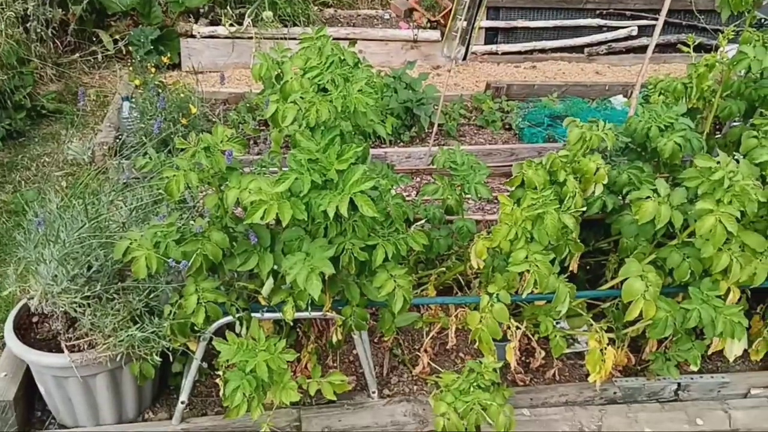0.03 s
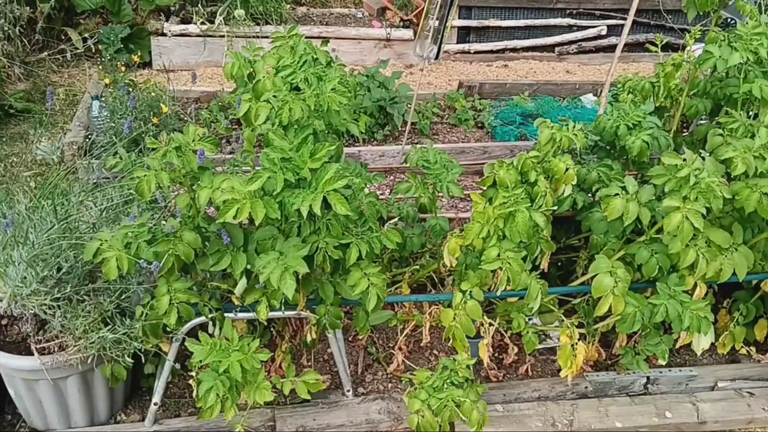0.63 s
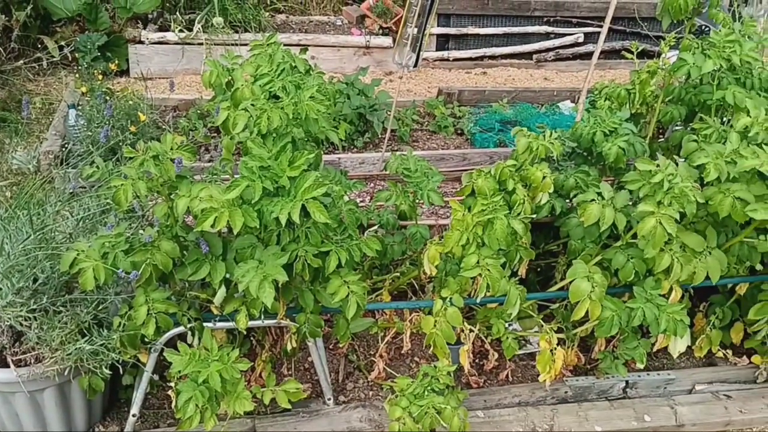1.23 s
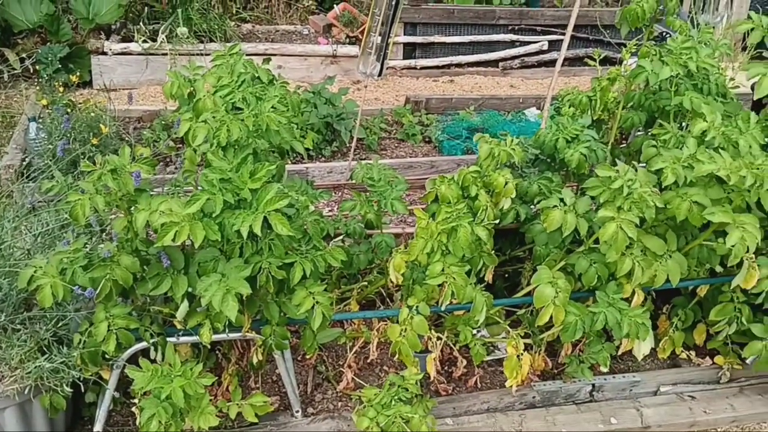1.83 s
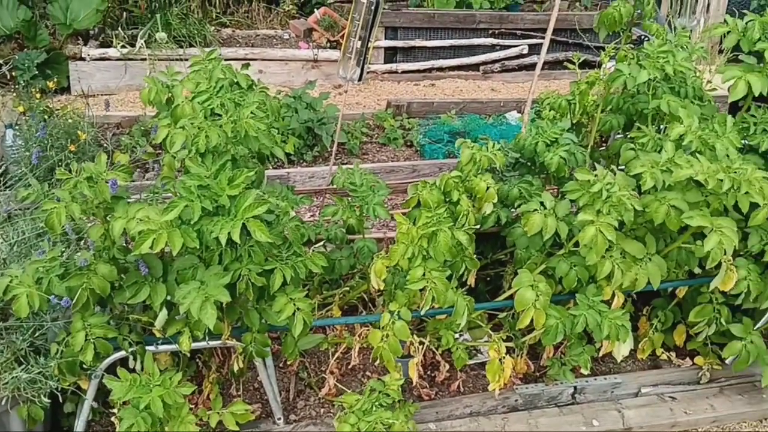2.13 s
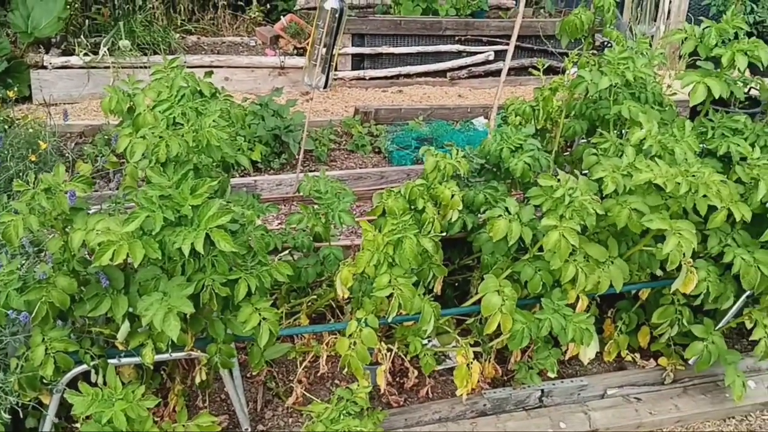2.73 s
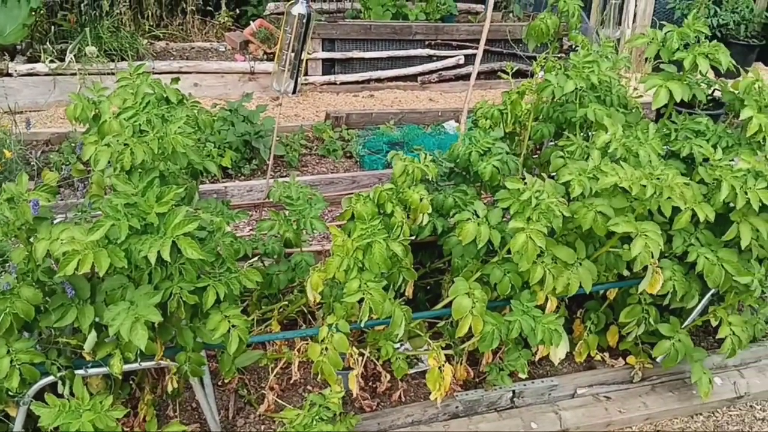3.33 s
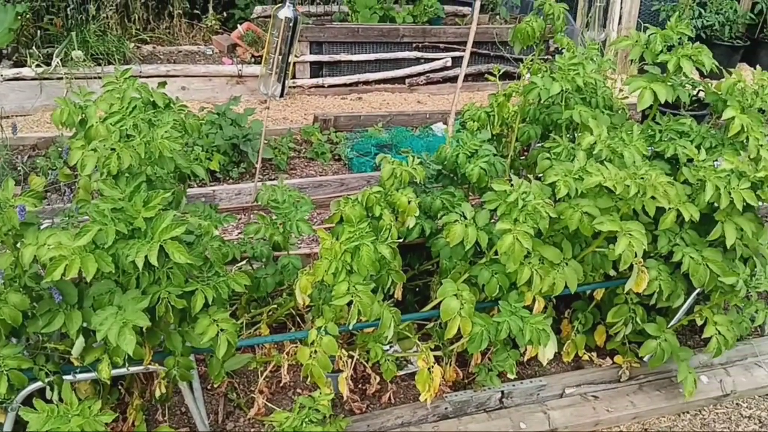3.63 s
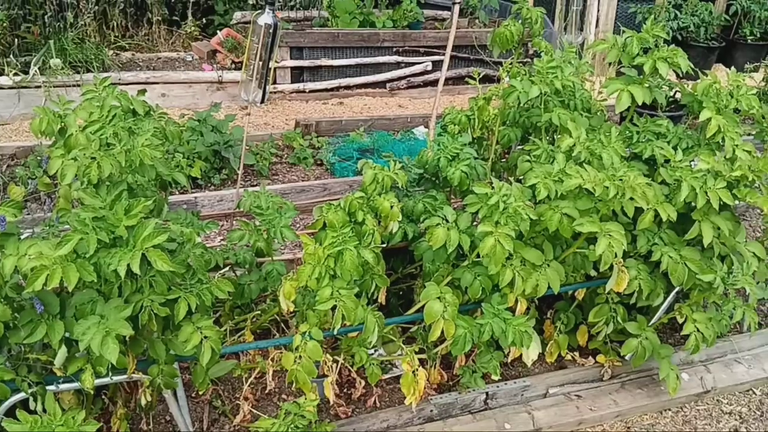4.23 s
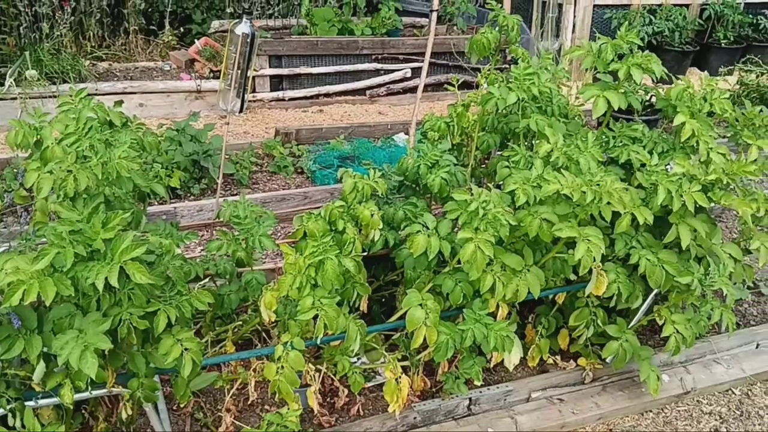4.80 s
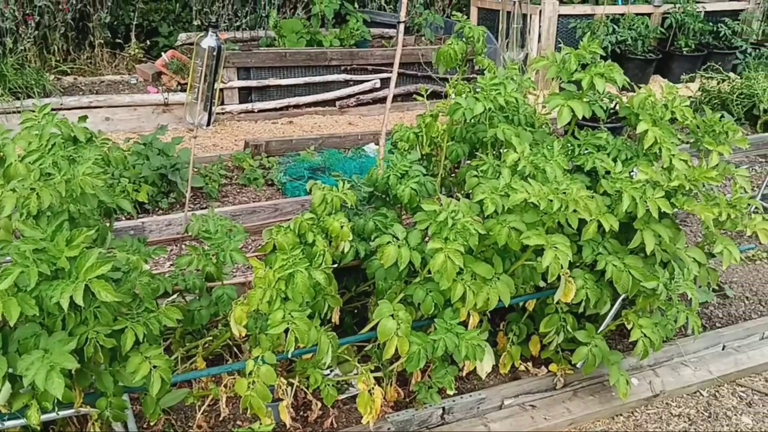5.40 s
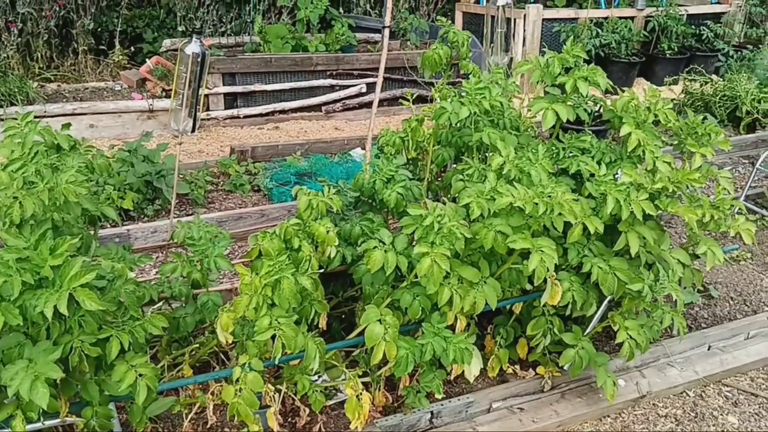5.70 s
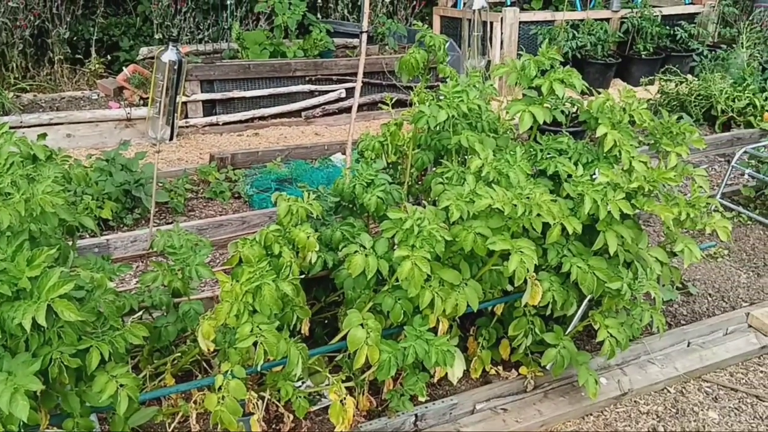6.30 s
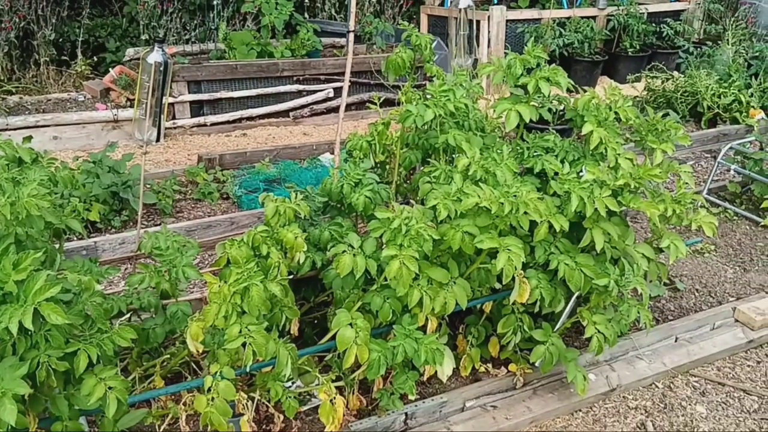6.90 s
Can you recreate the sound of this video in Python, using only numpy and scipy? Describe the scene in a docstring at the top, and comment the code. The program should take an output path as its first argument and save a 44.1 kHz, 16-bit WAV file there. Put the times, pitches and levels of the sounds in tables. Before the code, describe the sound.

A light wind thumps on the microphone and drops, leaving far traffic, faint bird chirps and a slight leaf rustle.

```python
"""A steady roar of far traffic over a quiet garden, with low buffets of breeze that soon drop.
The roar is tyre noise dulled by distance; under it far engines drone and a motor's hum throbs.
The buffets are eddies at a phone's two microphone ports. Small birds whistle and trill faintly,
scattered by fences and leaves. Close by, leaves brush and tick. The phone adds hiss and a thin whine."""
import sys
import numpy as np
from scipy import signal
from scipy.fft import rfft, irfft
from scipy.io import wavfile
from scipy.ndimage import uniform_filter1d

SR = 44100
rng = np.random.default_rng(int(sys.argv[2]) if len(sys.argv) > 2 else 0)


def waveform_to_disk(signal):
    """Save audio, clipped to [-1, 1], as 16-bit WAV at the path in sys.argv[1]."""
    frames = np.transpose(np.atleast_2d(signal))
    scaled = np.clip(frames, -1, 1) * 32767
    samples = np.round(scaled).astype(np.int16)
    wavfile.write(sys.argv[1], SR, samples)


N = 306495
T = np.arange(N) / SR
FREQS = np.maximum(np.arange(N // 2 + 1) * SR / N, 1)
PORT_LAG_S = 63 / SR  # left port behind right


def traffic(gain_db=0.3, ebb_db_per_s=0.31, swell_db=0.3, flutter_db=0.75):
    """Tyre roar dulled by distance; it slowly thins out and its band edges waver."""
    # tyre spectrum: (frequency [Hz], left [dB/Hz], right [dB/Hz])
    spectrum = [(297, -83, -86.5), (440, -82.5, -84), (534.5, -74, -75), (652, -64, -70.5),
                (800, -61, -67.5), (993, -61, -69.5), (1167, -66, -71), (1546, -66, -78),
                (1790, -70, -85.5), (1995, -71.5, -88), (2342, -84, -99.5), (2590, -100.2, -101.5),
                (2940, -108, -106.8), (4200, -114.5, -115)]
    # wavering bands: (centre [Hz], half width [Hz], changes [1/s], depth [dB], ebb [dB/s])
    edges = [(456, 130, 12, 2.5, 1.1), (2240, 170, 18, 2.5, -0.5), (2480, 240, 20, 2.5, 0)]
    roar = colour(far_field(), spectrum)
    roar *= undb(gain_db - ebb_db_per_s * T + swell_db * walk(2.66) + flutter_db * walk(12))
    for hz, half_width_hz, rate_hz, depth_db, band_ebb_db_per_s in edges:
        level_db = depth_db * walk(rate_hz) - band_ebb_db_per_s * (T - T.mean())
        roar = sway(roar, hz, half_width_hz, level_db)
    return sway(roar, hz=2140, half_width_hz=230, db=-7 * bell(2.5, 0.086))  # upper edge dips once


def wind(breeze_hz=54, breeze_db=-43, drop_at_s=2.8, drop_db_per_s=6, gust_hz=68, flutter_db=3):
    """Air at the ports: a breeze that drops, fluttering gusts, single eddies that thump."""
    # gusts: (middle [s], length [s], level [dB], left minus right [dB])
    gusts = [(0.724, 0.21, -21, 4.5), (0.973, 0.38, -35.5, 1), (1.75, 0.37, -32.5, -4.5),
             (2.399, 1, -39.5, -1.5), (3.3, 0.73, -38.5, 8), (6.382, 0.31, -38, 2.5)]
    # strongest eddies: (middle [s], length [s], centre [Hz], left [dB], right [dB])
    eddies = [(0.034, 0.064, 67, -26, -29.5), (0.542, 0.055, 55.7, -49, -25), (0.65, 0.11, 79, -31, -26),
              (.73, 0.1, 98.5, -19.5, -32), (0.802, 0.066, 152, -15.5, -42), (0.895, 0.054, 80, -22, -36),
              (0.951, 0.088, 73.6, -18, -36), (1.045, 0.079, 75.6, -21.5, -39),
              (1.362, 0.04, 69, -43.5, -28.5), (1.588, 0.053, 56, -51, -29), (1.685, .14, 84, -53, -27),
              (1.769, .08, 75.6, -41, -24), (1.839, .14, 63.7, -27, -39), (1.992, .04, 60, -53, -23.5),
              (2.125, 0.047, 55.6, -45, -29.5), (2.225, 0.073, 51.6, -32, -27.5),
              (2.376, 0.028, 51.6, -21.5, -57), (2.41, 0.0356, 64, -52, -29.5), (2.592, .11, 98, -50, -34),
              (3.058, 0.039, 59.3, -27, -40), (3.238, 0.036, 66, -22.5, -30), (3.391, 0.042, 59, -28, -38),
              (4.23, 0.23, 190, -52, -55.5), (4.789, 0.077, 146, -49, -65), (4.97, 0.079, 63, -38, -38),
              (6.359, .08, 99, -47, -62), (6.687, 0.069, 59.6, -36.5, -39)]
    breeze_gain = undb(breeze_db - drop_db_per_s * np.maximum(T - drop_at_s, 0))
    gust_gain = sum(bell(s, length_s) * undb(db) * pan(pan_db) for s, length_s, db, pan_db in gusts)
    flutter = undb(flutter_db * np.array([walk(21), walk(21.16)]))
    out = (turbulence(N, breeze_hz) * breeze_gain + turbulence(N, gust_hz) * gust_gain) * flutter
    for s, length_s, hz, left_db, right_db in eddies:
        size = int(length_s * SR)
        thump = unit(turbulence(SR // 4, hz)[:, :size] * np.hanning(size))
        add(out, s - length_s / 2, thump * undb([[left_db], [right_db]]))
    return out


def turbulence(size, hz, width_ratio=0.52, cutoff_ratio=2.37, order=3.54):
    """Pressure of eddies passing at about hz, unrelated at the two ports; small eddies die out fast."""
    freqs = bin_hz(size)
    rolloff = np.sqrt(1 + (freqs / (cutoff_ratio * hz)) ** (2 * order))
    gain = resonance(freqs, hz, width_ratio * hz) / rolloff
    return unit(irfft(rfft(rng.standard_normal((2, size))) * gain, size))


def engines(gain_db=1, ebb_db_per_s=0.5, lump_db=0.5):
    """Lumpy drone of far engines, slowly ebbing."""
    # drone spectrum: (frequency [Hz], left [dB/Hz], right [dB/Hz])
    spectrum = [(14.6, -52.5, -72.5), (30, -69.5, -69), (39.7, -62, -63.5), (58.3, -46, -51.5),
                (84.9, -59, -62.5), (132, -64.5, -73.5), (171, -77.5, -79), (190, -72.5, -75.5),
                (196, -77.5, -84), (221, -80.5, -81.5), (288, -86.5, -96)]
    return colour(far_field(), spectrum) * undb(gain_db - ebb_db_per_s * T + lump_db * walk(12))


def motor(hz=208, wander_hz=7, throb_hz=7.05, swell_db=-58, fading_db=1.5, pan_db=3):
    """A far motor's hum throbs, swells and fades in the moving air."""
    # throbs that stand out: (time [s], level [dB])
    surges = [(3.9, -58), (4.2, -44), (4.35, -52), (4.77, -56), (5.33, -56), (5.62, -54.5)]
    throb = 1 + np.cos(2 * np.pi * throb_hz * (T - 4.2))
    phase = 2 * np.pi * np.cumsum(hz + wander_hz * walk(12)) / SR
    tone = np.sin([phase - 2 * np.pi * hz * PORT_LAG_S, phase])
    swell = undb(swell_db) * bell(4.37, length_s=4.2)
    swell += sum(undb(db) * bell(s, length_s=0.046) for s, db in surges)
    return tone * throb * swell * undb(fading_db * walk(13)) * pan(pan_db)


def birds(t60_s=0.38, wet_db=-1, dry_db=-5):
    """Thin notes, a trill and far chatter, scattered by fences and leaves."""
    # notes: (start [s], length [s], from [Hz], to [Hz], level [dB], left minus right [dB],
    # rasp [share of pitch])
    notes = [(0.27, .07, 4400, 4400, -80, 6, .018), (0.433, 0.18, 2710, 2650, -70, 6, 0.025),
             (0.657, 0.044, 6800, 6450, -77, 7.5, 0.02), (1.118, .08, 5500, 5330, -83, -4, .022),
             (1.81, 0.091, 4170, 4100, -74, 2, 0.012), (1.965, 0.07, 4480, 4440, -73, 9, .012),
             (2.05, 0.073, 4400, 4390, -70, 9, 0.025), (2.245, 0.074, 4440, 4430, -72.5, 7, 0.028),
             (2.345, .06, 3250, 3170, -75, -5, 0.021), (3.48, 0.041, 3810, 3750, -73.5, -3, .015),
             (4.02, .09, 4680, 4650, -85, 0, .01), (4.72, .42, 4620, 4590, -90, 2, .008),
             (5.2, .09, 4420, 4300, -82, 2, .025), (5.55, 0.037, 3780, 3720, -76.5, 3, .015),
             (6.362, 0.18, 7450, 7500, -81, -2, .04), (6.44, 0.2, 7950, 7980, -83.5, -4, .025)]
    calls = trill() + chatter()
    for s, length_s, from_hz, to_hz, db, pan_db, rasp in notes:
        size = int(length_s * SR)
        note = whistle(np.linspace(from_hz, to_hz, size), waver=rasp) * np.sqrt(np.hanning(size))
        add(calls, s, note * undb(db) * pan(pan_db))
    t = T[:SR // 2]
    scatter = unit(rng.standard_normal((2, len(t))) * decay(t, t60_s)) / np.sqrt(len(t))
    echoes = signal.fftconvolve(calls, scatter, axes=1)[:, :N]
    return undb(dry_db) * calls + undb(wet_db) * echoes


def trill(rate_hz=21, low_hz=4480, sweep_hz=760, wander_hz=120, pip_hz=7300, pip_db=-14, pan_db=6):
    """A small bird's quick raspy syllables slide down, each led by a weak high pip."""
    # trill bursts: (middle [s], length [s], level [dB])
    bursts = [(1.878, 0.11, -74), (2.07, 0.26, -71), (2.27, 0.17, -73.5)]
    progress = np.cumsum(rate_hz * (1 + .25 * walk(14))) / SR % 1  # 0 to 1 per syllable
    pitch_hz = low_hz + sweep_hz * (1 - progress) ** 2 + wander_hz * walk(30)
    syllables = whistle(pitch_hz, waver=.035) * np.sqrt(np.sin(np.pi * progress))
    pips = whistle(np.full(N, pip_hz), waver=.025) * np.cos(np.pi * progress) ** 2
    return (syllables + undb(pip_db) * pips) * swells(bursts) * pan(pan_db)


def chatter(count=620, low_hz=2750, high_hz=4900, length_s=0.068, glide=.07,
            spread_db=4, pan_db=-2, width_db=8, base_db=-92.5, chorus_db=-79.5):
    """Many far birds chirp, louder for a while; distance leaves mostly the lower chirps."""
    out, size = np.zeros((2, N)), int(length_s * SR)
    for when, pitch, slope, loud, side in rng.random((count, 5)):
        hz = low_hz * (high_hz / low_hz) ** (pitch ** 2)
        slide = 1 + glide * (slope - .5) * np.linspace(-1, 1, size)
        chirp = whistle(hz * slide, waver=.025) * np.hanning(size)
        gain = (low_hz / hz) ** 2 * undb(spread_db * loud)
        add(out, when * N / SR, chirp * gain * pan(pan_db + width_db * (side - .5)))
    return out * (undb(base_db) + undb(chorus_db) * bell(1.96, length_s=2.6))


def ticks(tail_db=-22, tail_t60_s=.06):
    """Tiny hard contacts: a short crack in one broad resonance, with a weak tail."""
    # contacts: (time [s], level [dB], ring [Hz], width [Hz], t60 [s], left minus right [dB])
    contacts = [(0.7763, -55.5, 9300, 2800, 0.017, -19), (3.835, -63, 3900, 3600, 0.014, -11),
                (5.204, -68, 5200, 7000, .012, 1)]
    out, size = np.zeros((2, N)), SR // 10
    t = T[:size]
    for s, db, hz, width_hz, t60_s, pan_db in contacts:
        response = resonance(bin_hz(size), hz, width_hz) ** 2
        ring = unit(irfft(rfft(rng.standard_normal((2, size))) * response, size))
        fade = decay(t, t60_s) + undb(tail_db) * decay(t, tail_t60_s)
        add(out, s, ring * fade * undb(db) * pan(pan_db))
    return out


def leaves(count=40000, spread_db=3, pan_db=-11):
    """Leaves brush close by: tiny dry clicks, dense enough to merge into a rustle."""
    # click spectrum: (frequency [Hz], relative level [dB])
    spectrum = [(3500, -1.5), (6000, -2), (8000, -6), (9500, 3.5), (11000, -5.5)]
    # leaves stirring: (middle [s], length [s], level [dB])
    rustles = [(2.1, 0.75, -85), (3.63, 1.35, -83.5), (3.605, 0.02, -84), (4.345, .06, -80),
               (5.5, 1.6, -87)]
    clicks = np.zeros((2, N))
    when, loud, side = rng.random((count, 3)).T
    strength = undb(-spread_db * np.log(1 - .99 * loud))  # many weak, few strong
    np.add.at(clicks, ((side > .5).astype(int), (when * N).astype(int)), strength)
    crackle = unit(colour(clicks, [(hz, db, db) for hz, db in spectrum]))
    return crackle * swells(rustles) * pan(pan_db)


def hiss():
    """Steady microphone noise, unrelated in the two channels."""
    # hiss spectrum: (frequency [Hz], left [dB/Hz], right [dB/Hz])
    spectrum = [(2500, -118, -116), (5440, -119.5, -114.5), (7500, -121, -117), (8240, -128, -118),
                (9500, -132, -116.4), (11300, -136, -121), (12500, -134, -122.6), (15500, -136, -124.7)]
    return colour(rng.standard_normal((2, N)), spectrum)


def whine(waver=.003, flicker_db=3):
    """The phone's two faint high tones flicker and swell."""
    # tones: (frequency [Hz], level [dB])
    tones = [(7068, -92), (10638, -90.5)]
    # added swells: (middle [s], length [s], lower tone [relative dB], upper tone [relative dB])
    rises = [(1.3, .16, -3, 8), (2.05, .24, -2, 9), (3.74, .3, 2, -20)]
    out = np.zeros(N)
    for k, (hz, db) in enumerate(tones):
        swell = 1 + swells((s, length_s, rise_db[k]) for s, length_s, *rise_db in rises)
        gain = swell * undb(db + flicker_db * walk(30))
        out += whistle(np.full(N, hz), waver) * gain
    return out


def far_field(alike_hz=520, direct_share=0.3, direct_hz=1700):
    """White noise at two ports: long waves reach both alike, short ones only by the direct path."""
    direct = direct_share / (1 + (FREQS / direct_hz) ** 4)
    coherence = np.clip(direct + (1 - direct) * np.exp(-(FREQS / alike_hz) ** 2), 0, 1)
    right, unrelated = rfft(rng.standard_normal((2, N)))
    left = coherence * right + np.sqrt(1 - coherence ** 2) * unrelated
    lag = np.exp(-2j * np.pi * FREQS * PORT_LAG_S)
    return irfft(np.array([left * lag, right]), N)


def colour(white, spectrum, skirt_db_per_octave=40):
    """Shape stereo white noise to rows of (Hz, left dB, right dB), falling off outside them."""
    hz, *sides = np.transpose(spectrum)
    octave, points = np.log2(FREQS), np.log2(hz)
    outside = np.abs(octave - np.clip(octave, points[0], points[-1]))
    gain = undb([np.interp(octave, points, db) - skirt_db_per_octave * outside for db in sides])
    return irfft(rfft(white) * gain * np.sqrt(SR / 2), N)


def sway(x, hz, half_width_hz, db):
    """Let the band around hz follow a level curve."""
    band = irfft(rfft(x) * np.exp(-((FREQS - hz) / half_width_hz) ** 4), N)
    return x + band * (undb(db) - 1)


def whistle(hz, waver):
    """Near-sine whose pitch jitters by the share waver."""
    jitter = unit(uniform_filter1d(rng.standard_normal(len(hz)), size=SR // 150))
    return np.sqrt(2) * np.sin(2 * np.pi * np.cumsum(hz * (1 + waver * jitter)) / SR)


def resonance(freqs, hz, width_hz):
    """Band-pass response, gain 1 at hz."""
    return 1 / (1 + 1j * (freqs - hz ** 2 / freqs) / width_hz)


def bin_hz(size):
    """FFT bin frequencies, floored at 1 Hz."""
    return np.maximum(np.arange(size // 2 + 1) * SR / size, 1)


def walk(rate_hz):
    """Random steps smoothed twice, rms 1."""
    hold = int(SR / rate_hz)
    steps = np.repeat(rng.standard_normal(N // hold + 1), hold)
    return unit(uniform_filter1d(uniform_filter1d(steps, hold), hold)[:N])


def bell(middle_s, length_s):
    """Gaussian swell, peak 1."""
    return np.exp(-(2 * (T - middle_s) / length_s) ** 2)


def swells(rows):
    """Sum of bells from rows of (middle s, length s, dB)."""
    return sum(bell(s, length_s) * undb(db) for s, length_s, db in rows)


def decay(t, t60_s):
    """Fall of 60 dB per t60_s."""
    return np.exp(-np.log(1000) * t / t60_s)


def undb(db):
    """Decibels to gain."""
    return 10 ** (np.asarray(db) / 20)


def unit(x):
    """Scale to rms 1."""
    return x / np.sqrt(np.mean(x ** 2, axis=-1, keepdims=True))


def pan(db):
    """Stereo gains for left minus right in dB."""
    return undb(np.array([[db], [-db]]) / 2)


def add(out, s, sound):
    """Mix a stereo sound in from time s."""
    start = int(s * SR)
    a, b = max(start, 0), min(start + sound.shape[1], N)
    out[:, a:b] += sound[:, a - start:b - start]


def scene(dip_db=-16):
    """All sound at the two ports; the rumble dips briefly once."""
    rumble = (engines() + wind()) * undb(dip_db * bell(3.6, length_s=0.036))
    return traffic() + rumble + motor() + birds() + leaves() + ticks()


def record(dry, cutoff_hz=15700):
    """The phone adds hiss, whines in the right channel and cuts the top."""
    out = dry + hiss()
    out[1] += whine()
    return signal.sosfilt(signal.ellip(10, .1, 70, cutoff_hz, fs=SR, output="sos"), out)


dry = scene()
out = record(dry)
waveform_to_disk(out)
```